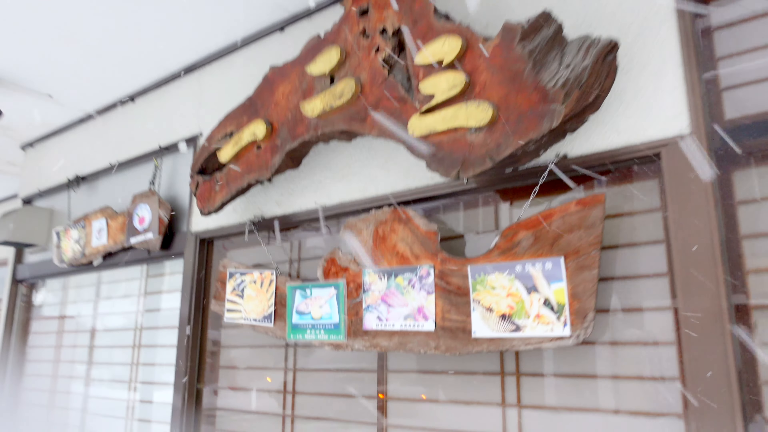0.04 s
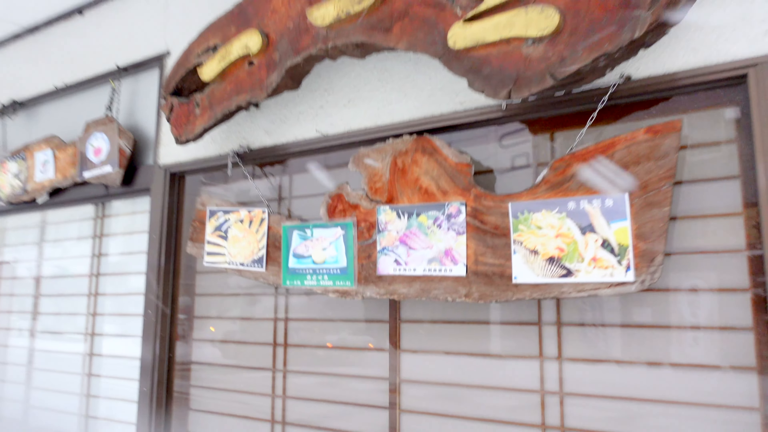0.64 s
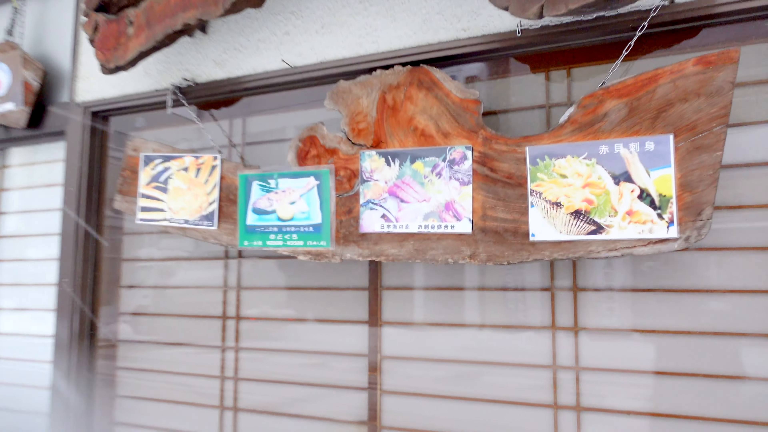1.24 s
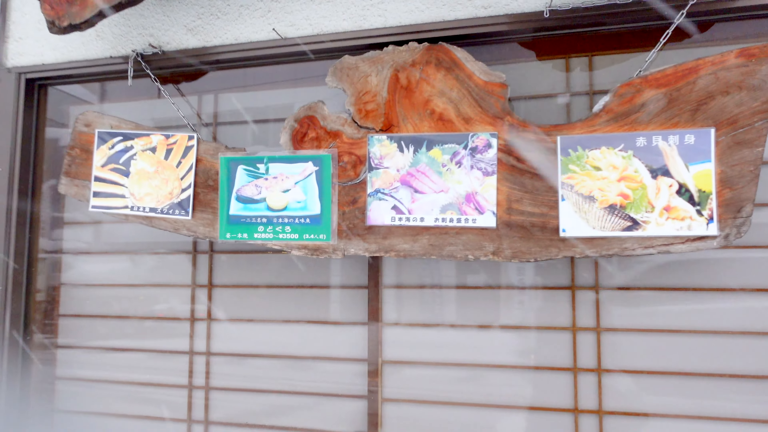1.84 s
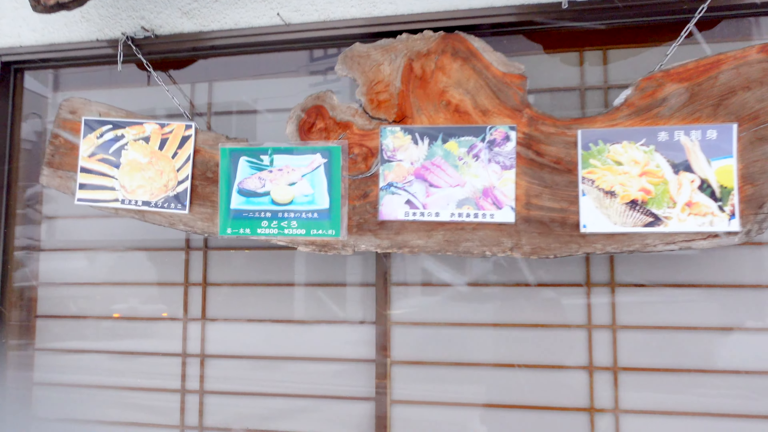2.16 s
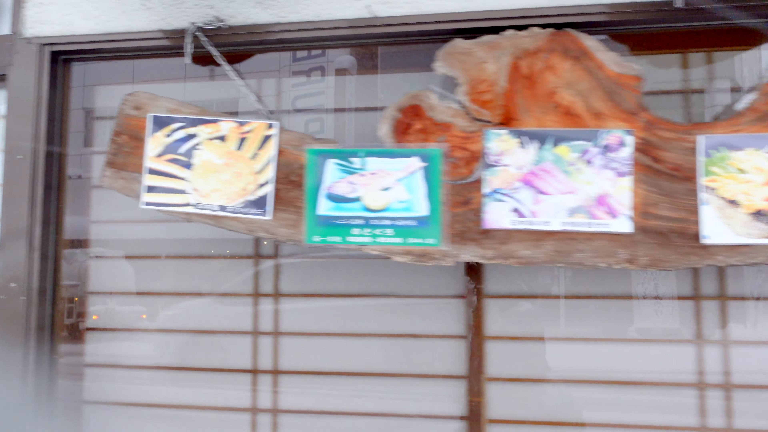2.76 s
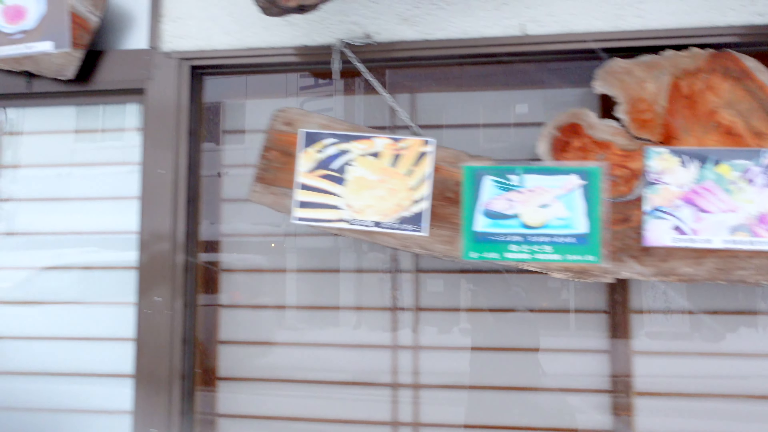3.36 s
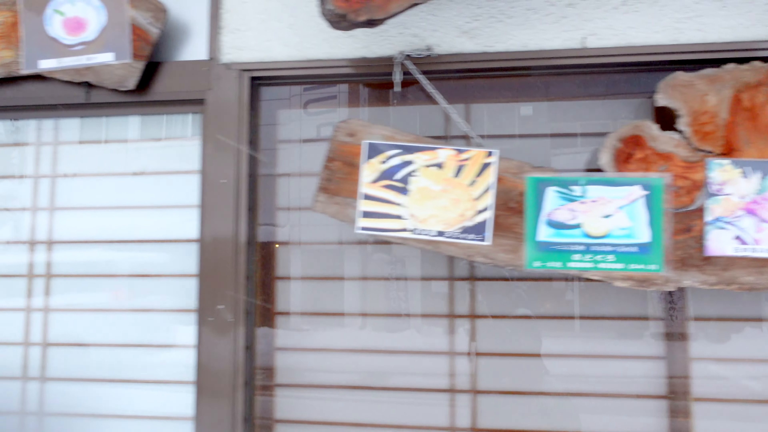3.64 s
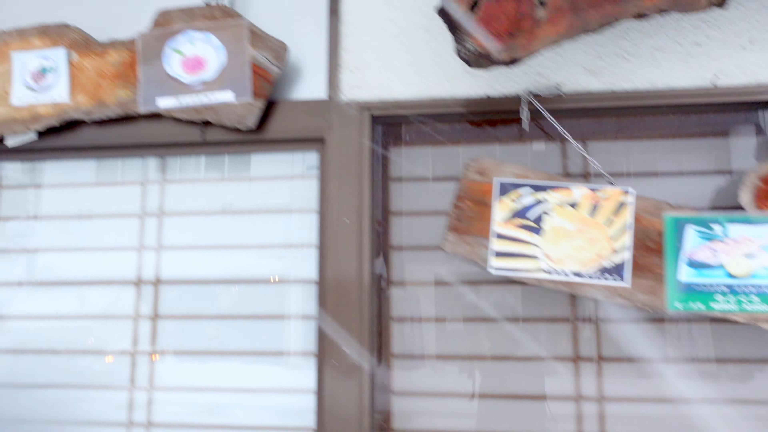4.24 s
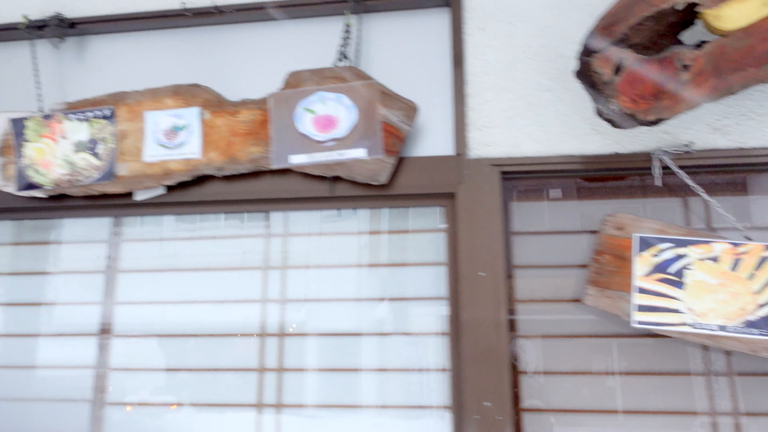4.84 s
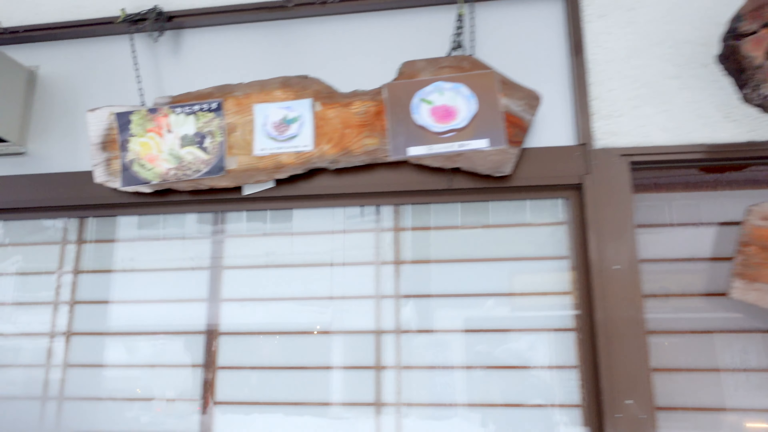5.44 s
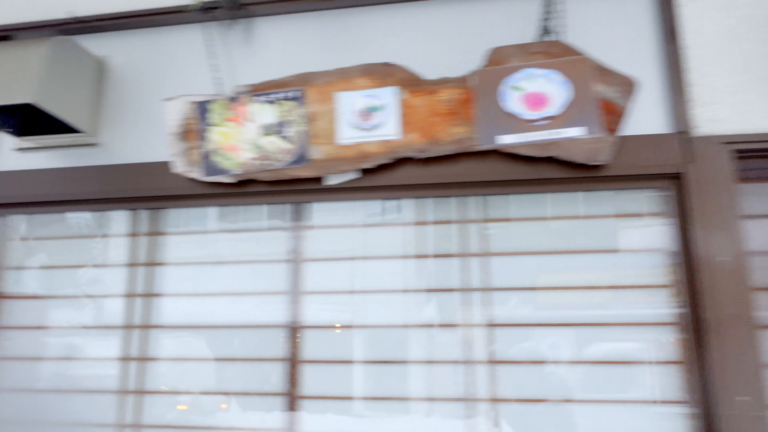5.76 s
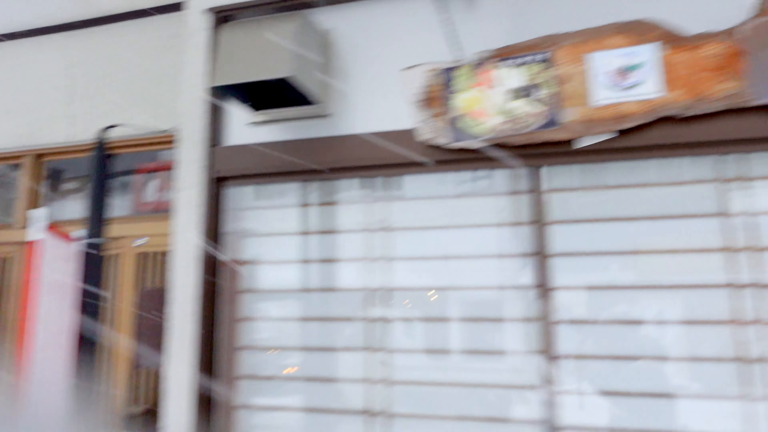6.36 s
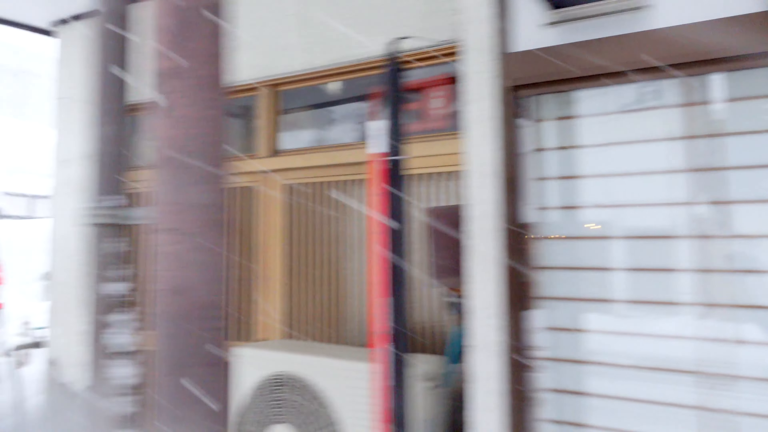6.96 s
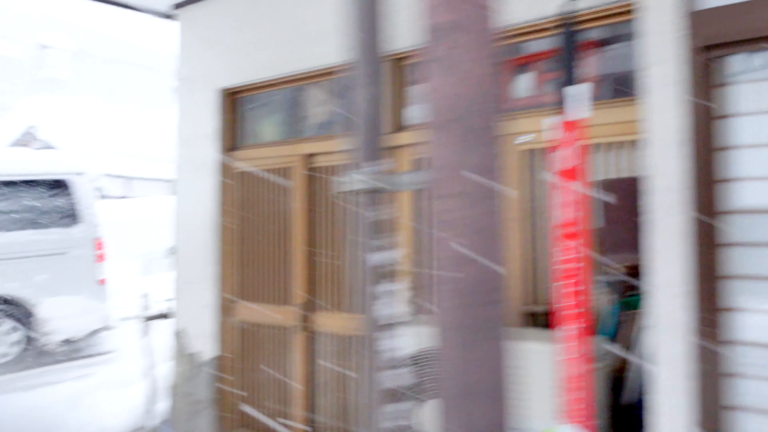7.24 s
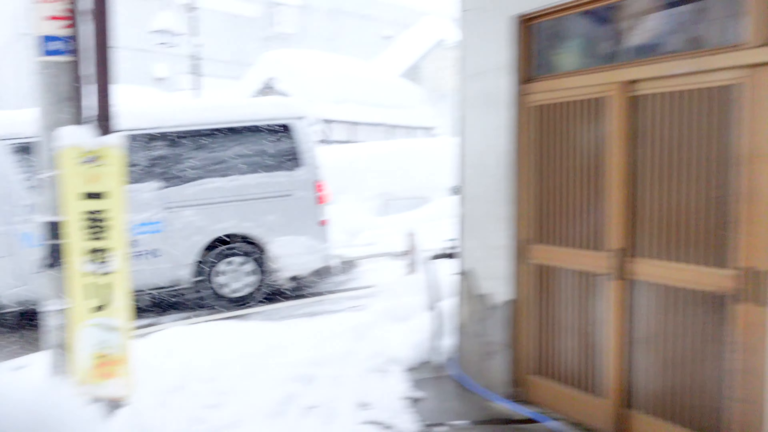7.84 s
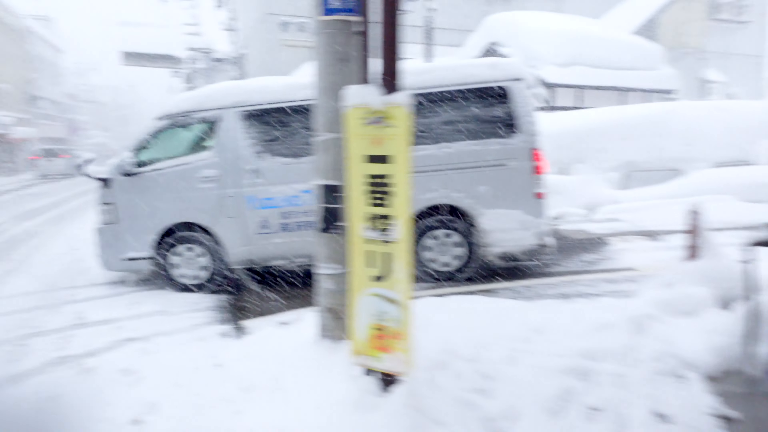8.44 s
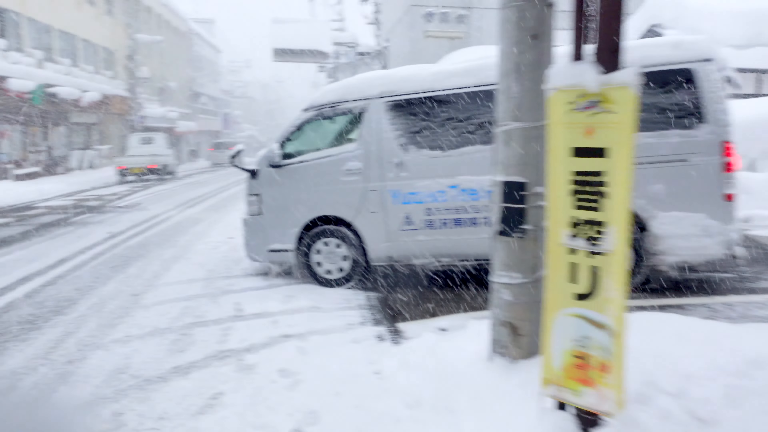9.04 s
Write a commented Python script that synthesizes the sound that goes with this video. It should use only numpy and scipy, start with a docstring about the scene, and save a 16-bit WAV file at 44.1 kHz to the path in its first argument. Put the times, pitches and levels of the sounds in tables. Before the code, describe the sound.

Cars pass on a slushy street, their wet tyres hissing and spraying as they swell and fade over faint engines.

```python
"""A slushy street in falling snow. A car rolls in from afar, its tyres rumbling, roaring, swishing through
the wet and flinging spray; it is closest at about 3 s. Treads scrub and squeak on packed snow, then a
second car sweeps past at 6 s with a sinking exhaust throb. Near 8 s a van creeps round the corner.
Faint engines and distant traffic lie under it all, heard through a close pair of hand-held microphones
that turns slowly from a shop front towards the road."""
import sys
import numpy as np
from scipy import signal
from scipy.fft import rfft, irfft, next_fast_len
from scipy.io import wavfile
from scipy.ndimage import uniform_filter1d, map_coordinates

SR = 44100
rng = np.random.default_rng(int(sys.argv[2]) if len(sys.argv) > 2 else 0)


def bounce(signal):
    """Save signal as a 16-bit WAV file at the path given by the first command-line argument."""
    frames = np.transpose(np.atleast_2d(signal))
    limited = np.clip(frames, -1, 1)
    pcm = np.round(limited * 32767).astype(np.int16)
    wavfile.write(sys.argv[1], SR, pcm)


N = 406161

# first car, second car, van: closest t/s, approach/s, leaving/s, level/dB of rumble, roar, swish, spray
DRIVE_BYS = [(3.15, 2.224, 2.19, -53.5, -38.5, -31.5, -37), (6.03, 0.79, 0.9, -53, -41, -34, -37),
             (7.85, 0.85, 2.4, -55, -42, -38.5, -42)]
def passes():
    """Faders for the three vehicles, each with four tyre layers: rumble, roar, swish and spray."""
    return np.array([amp(dbs)[:, None] * fade(s, before, after) for s, before, after, *dbs in DRIVE_BYS],
                    dtype=np.float32)


# drop over one approach or leaving time: loss/dB of rumble, roar, swish, spray
DISTANCE_LOSS = [2.9, 4.1, 6, 7.2]
def fade(s, before_s, after_s, steepness=2.39):
    """A pass is flat on top and falls ever faster; the treble fades fastest with distance."""
    distance = np.minimum(away(s, before_s, after_s) ** steepness, 20)
    return held(amp(-np.outer(DISTANCE_LOSS, distance)))


# tyre EQ of the first car far off and close, the second car and the van: f/Hz, level/dB
FAR_EQ = [(120, -44), (200, -15.5), (290, -19.5), (643, -13), (771, -11), (814, -7.5), (1050, -6),
          (2180, -2.5), (3080, -6), (3380, -10.5), (3910, -11), (4280, -21), (15600, -46.5)]
CLOSE_EQ = [(120, -46), (165, -14), (205, -10.5), (258, -20), (400, -23), (489, -14.5), (620, -13.5),
            (1050, -4.5), (1220, -5.5), (1820, -0.5), (2810, 0), (7270, -15), (10300, -22), (15600, -30)]
SECOND_EQ = [(120, -43), (200, -16), (249, -25), (407, -16), (489, -21), (600, -10.5), (1070, 2), (1570, 0),
             (1960, 5), (2710, 2.5), (6280, -11), (12100, -23.5), (15600, -27.5)]
VAN_EQ = [(120, -51), (200, -9), (265, -11), (393, -10), (535, -9), (829, -8.5), (892, -10), (1050, -4.5),
          (1240, -8), (1540, -4), (2670, -7), (4200, -8), (4610, -11.5), (6400, -14.5), (11100, -25),
          (15600, -32)]
# street resonances on each of those: f/Hz, width/Hz, boost/dB
FAR_BELLS = [(1710, 99, 2), (2080, 300, 0.5), (3420, 370, -1)]
CLOSE_BELLS = [(550, 100, -4), (790, 130, 1.5), (2170, 370, 0), (4100, 1000, 1)]
SECOND_BELLS = [(670, 190, 3.5), (805, 170, 5), (1310, 200, 2), (2200, 1200, -4)]
VAN_BELLS = [(853, 74, 5), (1680, 350, 0), (4100, 380, 2), (5000, 350, 3.5), (6160, 580, 1)]
def rolling_noise(far_until_s=1.68, crossfade_s=0.39):
    """Tyre layers of each vehicle; the first car crossfades from its far colour to its close one."""
    t = np.arange(N, dtype=np.float32) / SR
    close = (1 + np.tanh((t - far_until_s) / crossfade_s)) / 2
    first = np.sqrt(1 - close) * tyre_layers(FAR_EQ, FAR_BELLS)
    first += np.sqrt(close) * tyre_layers(CLOSE_EQ, CLOSE_BELLS)
    return [first, tyre_layers(SECOND_EQ, SECOND_BELLS), tyre_layers(VAN_EQ, VAN_BELLS)]


def tyre_layers(eq, bells, crossovers_hz=(230, 600, 1500, 4200, 22000)):
    """One vehicle's tyre noise split into rumble, roar, swish and spray, each of rms 1."""
    m = next_fast_len(N, real=True)
    hz = np.fft.rfftfreq(m, 1 / SR)
    colour_db = along(eq, hz) + sum(db * resonance(hz, centre, width) for centre, width, db in bells)
    lowpasses = [1 / (1 + (hz / edge) ** 20) for edge in crossovers_hz]
    bands = np.maximum(amp(colour_db) * np.diff(lowpasses, axis=0), 1e-9).astype(np.float32)
    white = rfft(rng.standard_normal((2, m), dtype=np.float32))
    return np.array([unit(irfft(white * band, m)[:, :N]) for band in bands])


# direction of the traffic, as left over right: t/s, swish pan/dB, spray pan/dB
PAN_MOVES = [(0.0, -4.5, -0.5), (0.1, -4, -1.5), (1.0, -4.5, -3), (2.77, -1.0, -0.5), (4.46, 2.5, -0.5),
             (5.49, -1.5, -0.5), (6.95, 0, -0.5), (7.23, 2, 1), (9.21, -1, -3.5)]
# narrow image of a vehicle in front, as side over mid: swish/dB, spray/dB
FRONT_WIDTH = [-23, -25]
# with none in front, sound comes from all round: t/s, half length/s, swish side/dB, spray side/dB
WIDE_MOMENTS = [(0, 0.56, -12, -10), (1.4, .5, -34, -23.5), (3.8, 0.31, -18, -27), (5.0, 0.46, -9.5, -7),
                (5.55, 0.12, -20, -13), (6.75, 0.15, -23, -21), (7.25, 0.43, -12, -26),
                (9.25, 0.25, -21, -18)]
def tyres(gains, surge, churn_db=0.5, splash_db=0.3, lurch_db=0.1):
    """Each vehicle's tyres swell and fade with its pass; slush churns unevenly under the treads."""
    traffic = sum(gain[:, None] * layers for gain, layers in zip(gains, rolling_noise()))
    rumble, roar, swish, spray = traffic * surge[:, None]
    pan, spray_pan = curves(PAN_MOVES)
    widening = sum(np.outer(amp(dbs), swell(s, half_s)) for s, half_s, *dbs in WIDE_MOMENTS)
    swish_side, spray_side = 20 * np.log10(amp(FRONT_WIDTH)[:, None] + widening)
    # lumps shake the upper three layers together, splashes each alone; the close first car churns most
    lumps = churn_db * (wobble(35) + 1.25 * wobble(110)) + lurch_db * wobble(14)
    depth = 0.44 + 0.22 * gains[0, 2] / gains[0, 2].max()
    churn = lambda: (lumps + splash_db * wobble(45)) * depth
    # long waves reach both microphones alike, short ones show the direction
    return (stereo(rumble, -17.5, -0.11)
            + stereo(roar, -8 + 0.25 * swish_side, 0.76 * pan) * amp(churn())
            + stereo(swish, swish_side, pan) * amp(churn())
            + stereo(spray, spray_side, spray_pan) * amp(0.71 * churn()))


# the low end swells and dips: t/s, half length/s, rumble boost/dB, roar boost/dB
LOW_RIDES = [(1.15, 0.3, 0.5, 1.5), (1.65, .2, -0.5, -0.5), (2.15, 0.28, -1.5, -2.5),
             (2.7, 0.24, 1.5, -1.5), (3.75, 0.28, -4.5, -0.5), (4.4, 0.49, 0, 1.5), (6.08, 0.29, 1.5, 1),
             (7.05, 0.17, -6, -3.5), (7.24, 0.034, 2, -0.5), (7.43, 0.045, -0.5, -0.5), (9.0, 0.25, 0, -1)]
# wetter and drier slush: t/s, half length/s, swish boost/dB, spray boost/dB
SLUSH_PATCHES = [(.29, 0.054, -1.5, 0), (.55, 0.18, -0.5, -2), (.88, 0.14, 1.5, 2.5),
                 (1.41, 0.055, 1.5, -0.5), (1.76, 0.061, 0, 2), (1.9, 0.067, 1.3, -1.8),
                 (2.04, 0.045, 1, 0.5), (2.15, 0.049, -2, 0), (2.33, 0.12, 4, 2), (2.75, .06, -0.5, -2),
                 (2.92, 0.14, 3.5, 3), (3.38, 0.061, 1.5, 2.5), (3.68, 0.045, -2.5, 0),
                 (4.07, 0.044, -1, 0), (4.52, 0.06, 1, 1), (4.72, 0.11, -2, 0), (5.02, 0.087, -2.5, 0.5),
                 (5.22, 0.097, 0.8, 5.5), (5.38, 0.046, -0.5, 2), (5.53, 0.07, -1.2, 2.5),
                 (6.51, 0.23, 2.5, 2.5), (7.1, 0.28, 1.5, 3.5)]
def surges():
    """Fader rides on the four tyre layers: the lows heave, the highs flare in the wet patches."""
    boost = lambda rows: sum(np.outer(dbs, swell(s, half_s)) for s, half_s, *dbs in rows)
    return amp(np.vstack([boost(LOW_RIDES), boost(SLUSH_PATCHES)]))


# strength of the flicker: f/Hz, depth/dB
FLICKER_DEPTH = [(500, .3), (1200, .7), (4000, 1.1), (9000, 1.5)]
def hiss_flicker(x, patch_hz=350, patch_s=.025, frame=512):
    """The hiss flickers: small patches brighten and dull at random, most in the treble."""
    hz, t, spectrum = signal.stft(x.astype(np.float32), SR, nperseg=frame)
    patches = rng.standard_normal(spectrum.shape[1:])
    patches = uniform_filter1d(patches, max(1, round(patch_hz / hz[1])), axis=0)
    patches = uniform_filter1d(patches, max(1, round(patch_s / t[1])), axis=1)
    gain = amp(along(FLICKER_DEPTH, hz)[:, None] * unit(patches))
    gain /= np.sqrt(np.mean(gain ** 2, axis=1, keepdims=True))
    return signal.istft(spectrum * gain, SR, nperseg=frame)[1][:, :N]


# resonant sweeps in the swish: t/s, half length/s, f/Hz, glide/(Hz/s), width/Hz, level/dB
SWISH_SWEEPS = [(0.388, .07, 1674, -100, 130, -45), (0.849, .17, 1317, -450, 200, -48),
                (2.29, 0.049, 3466, -6000, 2600, -33), (2.99, .03, 2490, -100, 1400, -30),
                (3.13, 0.066, 2390, -300, 900, -35), (3.372, 0.016, 2290, 0, 1700, -33),
                (3.52, 0.13, 2300, -600, 1200, -35), (3.981, .24, 2610, -150, 900, -42),
                (4.3, 0.057, 1146, 498, 110, -41.5), (4.3, 0.083, 1410, 750, 90, -43.5),
                (4.41, 0.051, 1205, 400, 90, -43), (4.378, .17, 2680, -300, 830, -44),
                (4.53, .05, 3640, 0, 700, -45), (4.68, 0.24, 1785, -600, 650, -40),
                (4.76, .05, 1340, 300, 110, -42), (4.78, .14, 4290, 0, 1800, -46),
                (6.46, .09, 2690, -600, 1600, -41), (6.503, .2, 1330, -200, 300, -46),
                (7.1, .08, 4200, 2, 900, -47), (7.571, 0.21, 4250, 0, 700, -45),
                (8.188, 0.1, 4200, -100, 400, -48), (8.499, .4, 1730, 50, 280, -54),
                (8.875, .13, 2000, 0, 600, -50)]
def swish_sweeps():
    """Bands of tyre hiss stand out for a moment and slide in pitch as the vehicles move."""
    out = np.zeros((2, N))
    offsets_hz = np.fft.fftfreq(2 ** 16, 1 / SR)
    for s, half_s, hz, hz_per_s, width_hz, db in SWISH_SWEEPS:
        gain = swell(s, half_s)
        on = np.flatnonzero(gain > .01)
        t = on / SR - s
        white = rng.standard_normal((2, len(offsets_hz), 2)) @ [1, 1j]
        band = np.fft.ifft(white * resonance(offsets_hz, 0, width_hz) ** 2)
        carrier = np.exp(2j * np.pi * (hz + hz_per_s * t / 2) * t)
        sweep = np.take(band, on, axis=1, mode="wrap") * carrier
        out[:, on] += amp(db) * gain[on] * unit(sweep.real)
    return stereo(out, side_db=-14)


# air sings in the tread grooves: t/s, half length/s, level/dB
GROOVE_CUES = [(1.15, .25, -46), (1.6, .06, -49), (2.55, 0.11, -47), (3.1, 0.33, -47.5), (4.25, 0.1, -43),
               (4.8, 0.18, -44.5), (5.05, .1, -45.5), (5.29, 0.11, -41), (8.39, 0.04, -49),
               (8.56, .06, -47.5), (8.72, 0.044, -47), (8.9, .06, -53), (9.08, .08, -48)]
# treads scrub over packed snow: t/s, half length/s, level/dB
SCRUB_CUES = [(1.25, 0.28, -51), (2.47, 0.24, -44), (3.59, 0.043, -39), (4.2, 0.035, -43),
              (4.72, 0.22, -40.5), (5.08, .15, -42)]
# colour of the scrub's rasp: f/Hz, width/Hz, level/dB
RASP_BELLS = [(1180, 220, 5), (1390, 400, -1)]
def grooves(note_hz=1056, width_hz=26):
    """Tread grooves ring like short pipes in a fuzzy note; scrubbing adds a rasp just above it."""
    note = noise(lambda hz: resonance(hz, note_hz, width_hz))
    note /= np.sqrt(np.abs(uniform_filter1d(note ** 2, SR // 30)) + 1e-6)  # even out its strength
    rasp = noise(lambda hz: sum(amp(db) * resonance(hz, f, width) for f, width, db in RASP_BELLS))
    return stereo(note * swells(GROOVE_CUES) + rasp * swells(SCRUB_CUES), side_db=-19)


# squeaks near the grooves' note: t/s, half length/s, f/Hz, glide/(Hz/s), level/dB
SQUEAK_CUES = [(4.477, 0.036, 1062, 450, -37), (5.41, 0.018, 1020, -500, -41), (8.39, .035, 1024, -2, -51)]
def squeaks():
    """Rubber slipping on packed snow locks on to one pitch for a moment and slides."""
    out = np.zeros(N)
    for s, half_s, hz, hz_per_s, db in SQUEAK_CUES:
        gain = swell(s, half_s)
        on = np.flatnonzero(gain > .001)
        t = on / SR - s
        out[on] += amp(db) * gain[on] * unit(np.sin(2 * np.pi * (hz + hz_per_s * t / 2) * t))
    return out


# sharp spits of slush: t/s, relative level/dB
SPIT_CUES = [(.3735, -39), (.8854, -33), (1.0804, -28), (1.1074, -32), (1.6896, -31), (1.7514, -25),
             (2.035, -26), (2.0426, -17), (2.0627, -26), (2.1879, -32), (2.3012, -27), (2.7721, -28),
             (3.5907, -21), (3.7688, -28), (5.1248, -28), (6.9247, -35), (7.3597, -28), (8.037, -31),
             (8.073, -33), (8.2442, -38), (8.5894, -38), (8.7136, -31), (8.8318, -39), (8.991, -30)]
# bright EQ on ticks and spits: f/Hz, level/dB
DROPLET_EQ = [(2000, -25), (6000, -3), (9500, -1.5), (13500, -6), (15500, -6.5)]
def droplets(spray_gain, splash_gain, count=1400, tick_db=-9, spit_db=-4.5, spit_decay_s=0.0017):
    """Flung droplets tick through the spray, crowding where the tyres splash; a few larger ones spit."""
    ticks = np.zeros((2, N))
    crowding = np.cumsum(splash_gain.astype(float) ** 3)
    at = np.searchsorted(crowding, rng.random(count) * crowding[-1])
    ticks[:, at] = amp(tick_db) * rng.choice([-1, 1], (2, count)) * spray_gain[at]
    t = np.arange(SR // 25) / SR
    for s, db in SPIT_CUES:
        spit = amp(db + spit_db) * np.exp(-t / spit_decay_s) * rng.standard_normal((2, len(t)))
        ticks[:, round(s * SR):][:, :len(t)] += spit
    return stereo(filtered(ticks, lambda hz: amp(along(DROPLET_EQ, hz))), side_db=-12)


def wall_echoes(x, count=6, echo_db=-24, drift_s=.00018):
    """Snow and shop fronts return weak copies; their delays drift slowly at random and comb the hiss."""
    echo = amp(echo_db)
    out = x.copy()
    for delay_s in rng.uniform(.002, .016, count):
        lag = np.rint(SR * (delay_s + drift_s * wobble(.6))).astype(int)
        out += echo * np.take(x, np.arange(N) - lag, axis=1, mode="wrap")
    return out / np.sqrt(1 + count * echo ** 2)


# the engine bed with the traffic at its closest: order, level/dB
DRONE_ORDERS = [(3, -82), (4, -72), (5, -72), (6, -84)]
# booms on single orders: t/s, half length/s, order, level/dB
BOOM_CUES = [(1.15, 0.2, 4, -64), (1.23, 0.07, 5, -62), (1.5, 0.12, 4, -69), (1.86, .12, 4, -60.5),
             (2.17, 0.058, 4, -66), (2.5, 0.064, 5, -67), (2.6, 0.14, 3, -64.5), (2.654, 0.058, 4, -53),
             (2.926, 0.27, 6, -59), (2.95, 0.18, 5, -69), (3.42, .14, 4, -60), (3.91, .09, 4, -58),
             (4.18, 0.16, 4, -56), (4.45, 0.075, 4, -61), (4.47, 0.28, 5, -63), (5.75, .35, 4, -65.5),
             (5.85, 0.41, 5, -71), (7.238, 0.045, 4, -68), (8.2, 0.49, 5, -73.5), (8.9, 0.32, 4, -71),
             (9.119, 0.12, 3, -68)]
def engine_drone(near_db, firing_hz=43.3, drift=0.008, uneven_db=3.5, cavity_hz=205, cavity_db=1.5):
    """Low orders of a steady engine follow the nearness of the traffic and boom in turn."""
    firing = firing_hz * (1 + drift * wobble(2))
    gains = {round(order): amp(db + 0.91 * near_db + uneven_db * wobble(5.4))
             for order, db in DRONE_ORDERS}
    for s, half_s, order, db in BOOM_CUES:
        gains[round(order)] += amp(db) * swell(s, half_s)
    # the air inside the tyres hums just under the fifth order
    cavity = amp(cavity_db) * gains[5] * tone(np.full(N, cavity_hz), flutter=0.42)
    return cavity + sum(gain * tone(order * firing, flutter=.34) for order, gain in gains.items())


# the second car's throbs: t/s, half length/s, order, level/dB
THROB_CUES = [(5.35, .25, 3, -67), (5.85, .18, 2, -76), (5.9, .3, 3, -68), (6.307, .08, 2, -70),
              (6.3, .09, 3, -64), (6.63, .14, 2, -73), (6.63, .15, 3, -70), (7.1, .07, 2, -71),
              (7.38, 0.063, 2, -71)]
def exhaust(firing_hz=46.3, doppler=.08, bend_s=1.3):
    """The second car's exhaust throbs, its pitch sinking with the Doppler shift as it goes by."""
    t = np.arange(N) / SR - DRIVE_BYS[1][0]
    firing = firing_hz * (1 - doppler * np.tanh(t / bend_s))
    tones = {order: tone(order * firing) for order in (2, 3)}
    return sum(amp(db) * swell(s, half_s) * tones[round(order)] for s, half_s, order, db in THROB_CUES)


def van_engine(hz=92.5, rise_hz_per_s=1.43, level_db=-80.5, approach_s=.8):
    """The van's engine hums and picks up as it turns."""
    closest_s, _, leaving_s, *_ = DRIVE_BYS[2]
    t = np.arange(N) / SR - closest_s
    return amp(level_db) * fade(closest_s, approach_s, leaving_s)[0] * tone(hz + rise_hz_per_s * t)


# EQ of the distant traffic bed: f/Hz, level/dB
TOWN_EQ = [(20, -27), (45, -23), (75, -14), (110, -6), (150, 7), (260, 0), (400, -4.5), (900, -50)]
def town(near_db):
    """Distant traffic murmurs below everything, swelling a little with the near cars."""
    murmur = stereo(noise(lambda hz: amp(along(TOWN_EQ, hz))), side_db=-20)
    return murmur * amp(-63.5 + 0.54 * near_db + wobble(2.1))


def tone(hz, flutter=0.33):
    """A hum of rms 1 whose strength and phase waver, as with uneven firing."""
    phase = 2 * np.pi * np.cumsum(hz) / SR
    return unit((1 + flutter * wobble(12)) * np.sin(phase) + flutter * wobble(11) * np.cos(phase))


def amp(db):
    return 10 ** (np.asarray(db) / 20)


def unit(x):
    return x / np.sqrt(np.mean(x ** 2) + 1e-20)


def along(points, hz):
    """An EQ curve through (f/Hz, value) points on a log axis."""
    f, values = np.transpose(points)
    return np.interp(np.log(hz + 1), np.log(f + 1), values)


def resonance(hz, centre, width):
    """A bell-shaped peak of height 1."""
    return 1 / (1 + (2 * (hz - centre) / width) ** 2)


def filtered(x, response):
    """x through a frequency response."""
    m = next_fast_len(N + SR // 8, real=True)
    return irfft(rfft(x, m) * response(np.fft.rfftfreq(m, 1 / SR)), m)[..., :N]


def noise(response):
    """Two unrelated noises (mid, side) of rms 1 with the given colour."""
    return unit(filtered(rng.standard_normal((2, N)), response))


def stereo(pair, side_db, pan_db=0):
    """Left and right from mid and side."""
    side = pair[1] * amp(side_db)
    return np.array([(pair[0] + side) * amp(pan_db / 2), (pair[0] - side) * amp(-pan_db / 2)])


def curves(rows):
    """An automation lane for each column after the time."""
    s, *columns = np.transpose(rows)
    return [np.interp(np.arange(N) / SR, s, column) for column in columns]


STEP = 32  # samples per control step
def held(slow):
    return np.repeat(slow.astype(np.float32), STEP, axis=-1)[..., :N]


def wobble(rate):
    """A smooth random curve, rate knots a second."""
    knots = rng.standard_normal(int(N * rate / SR) + 4)
    coarse = np.arange(0, N, STEP)
    return np.interp(np.arange(N), coarse, map_coordinates(knots, [coarse * rate / SR]))


def away(s, before_s, after_s):
    """Distance from a cue, per control step: 0 at time s, 1 at before_s ahead and after_s past it."""
    t = np.arange(0, N, STEP) / SR - s
    return np.minimum(np.maximum(-t / before_s, t / after_s), 10)


def swell(s, half_s):
    """A rounded bump of height 1 that is down to a half at half_s either side."""
    return held(.5 ** np.minimum(away(s, half_s, half_s) ** 1.92, 20))


def swells(cues):
    """The gain of a train of bumps."""
    return sum(amp(db) * swell(s, half_s) for s, half_s, db in cues)


def scene():
    """The street mix: three passes drive tyres, droplets and engines, over the town bed."""
    gains, surge = passes(), surges()
    *_, swish, spray = np.linalg.norm(gains, axis=0)
    near_db = 20 * np.log10(swish / swish.max())
    splash = surge[-1]
    treads = swish_sweeps() + grooves() + squeaks()
    rolling = hiss_flicker(wall_echoes(tyres(gains, surge)))
    drops = droplets(spray * splash, splash)
    engines = (exhaust() + van_engine() + engine_drone(near_db)) * amp([[.5], [-.5]])  # a touch left
    return rolling + treads + drops + engines + town(near_db)


# stereo width by frequency: f/Hz, side gain/dB
SIDE_EQ = [(200, 1), (500, 1), (900, -1.5), (1800, 1), (4600, -0.5), (6500, 0.5), (10000, -2), (14500, -8)]
# treble roll-off: f/Hz, level/dB
TREBLE_EQ = [(7000, -0.5), (10000, -1.5), (13500, -3.5), (15500, -7)]
def record(dry, top_hz=15790):
    """The top treble is narrower and softer, and stops near 15.8 kHz."""
    mid = (dry[0] + dry[1]) / 2
    side = filtered((dry[0] - dry[1]) / 2, lambda hz: amp(along(SIDE_EQ, hz)))
    left_right = np.array([mid + side, mid - side])
    return filtered(left_right, lambda hz: amp(along(TREBLE_EQ, hz)) * (hz < top_hz))


dry = scene()
out = record(dry)
bounce(out)
```